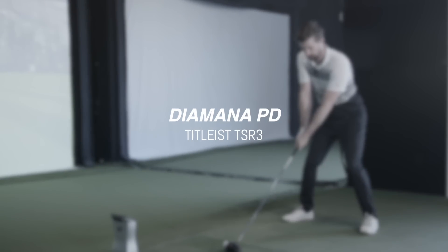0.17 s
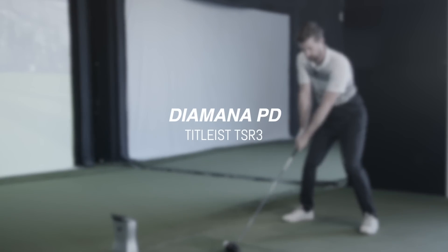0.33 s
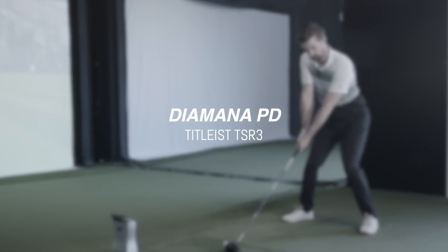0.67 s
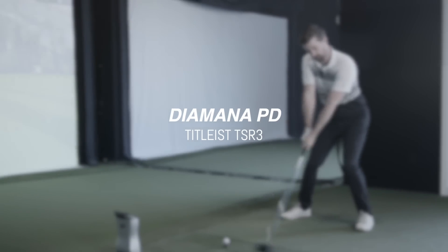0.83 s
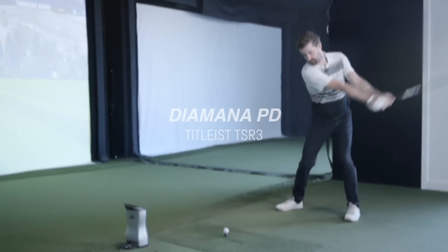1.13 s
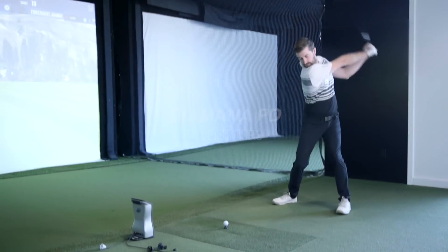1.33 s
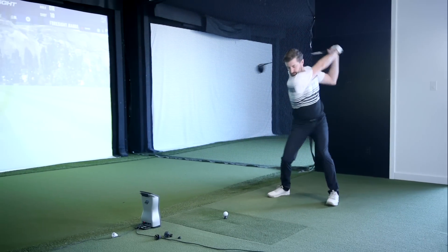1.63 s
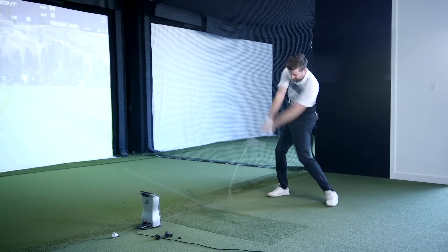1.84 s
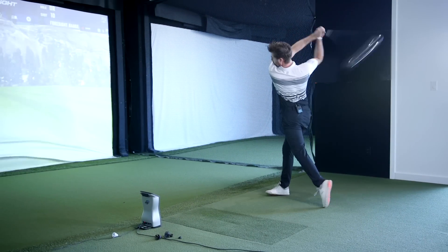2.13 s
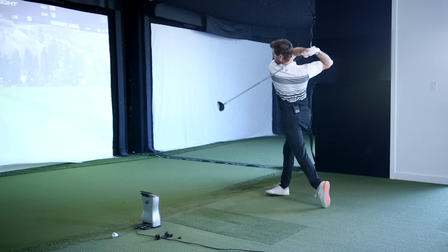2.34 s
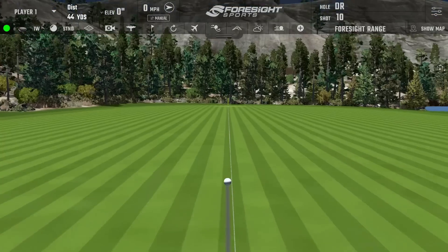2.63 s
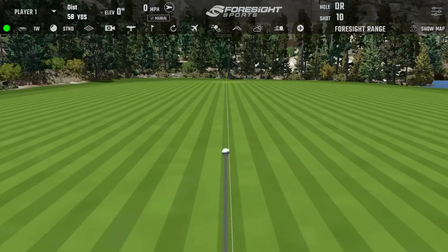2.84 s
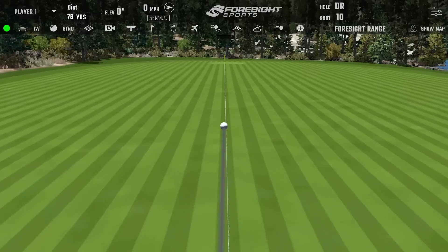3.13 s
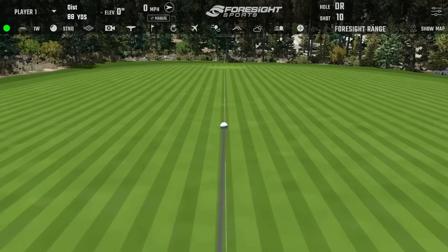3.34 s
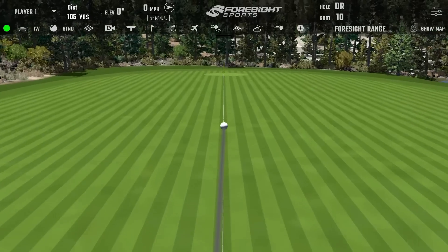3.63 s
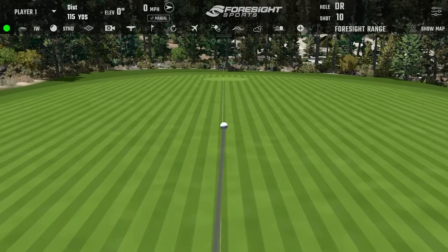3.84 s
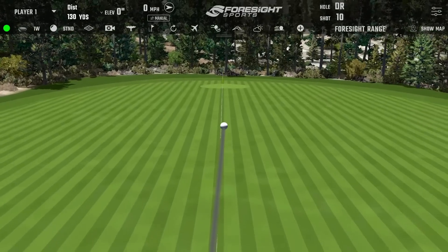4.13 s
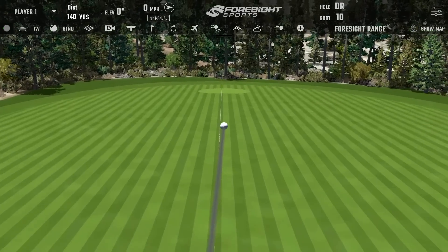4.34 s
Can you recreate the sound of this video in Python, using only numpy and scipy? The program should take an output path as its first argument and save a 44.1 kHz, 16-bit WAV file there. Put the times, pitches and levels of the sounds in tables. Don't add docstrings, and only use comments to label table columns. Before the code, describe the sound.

A golf driver cracks a ball in a reverberant indoor bay after cloth rustle and a swish, then the ball booms into a hanging screen.

```python
import sys
import numpy as np
from scipy import signal
from scipy.io import wavfile
from scipy.ndimage import uniform_filter1d

SR = 44100
rng = np.random.default_rng(int(sys.argv[2]) if len(sys.argv) > 2 else 0)


def invert_db(x):
    u = np.asarray(x, float) / 20
    return 10 ** u


def file_out(sig):
    cols = np.atleast_2d(sig).T
    lim = np.clip(cols, -1, 1)
    pcm = np.round(lim * 32767).astype(np.int16)
    wavfile.write(sys.argv[1], SR, pcm)


N = 197700

# [f/Hz, t60/s], t60 = time to fall by 60 dB
HALL_RING = [(60, 1.6), (120, 1.1), (250, 1.014), (1000, 1.126), (3000, 1.216), (5500, 1.013), (8000, 0.76),
             (12000, 0.69), (16000, .4)]
# [f/Hz, level/dB per Hz]
AIR_COLOUR = [(15, -39.5), (25, -14), (107, 1.5), (148, -10.5), (189, -13), (361, -16.5), (391, -13),
              (512, -19.5), (602, -20), (688, -19.5), (809, -24), (1500, -32), (4500, -41.5), (15700, -46)]
# [f/Hz, level/dB]
FAN_HUM = [(393.0, -68.5), (543.7, -67), (592.2, -66.5)]
# [f/Hz, level/dB per Hz]
SLACK_CLOTH = [(400, -21.5), (1300, 0.5), (3460, -3.5), (4640, 1), (7080, -6), (7740, -3.5), (11900, -3),
               (15700, -7)]
TAUT_CLOTH = [(600, -28.5), (1200, -5.5), (2200, -0.5), (3500, -8), (8320, -11), (15700, -15)]
# [peak t/s, level/dB, rise/s, fall/s, tautness/0-1]
RUBS = [(0.33, -85, 0.073, .08, .1), (0.77, -68.5, 0.069, .08, .1), (1.17, -60.5, 0.25, .35, 0.34),
        (1.46, -55.5, 0.16, .04, 0), (1.492, -53, 0.022, .06, 0), (1.55, -45, 0.084, .09, 0),
        (1.625, -49.5, 0.027, .035, 0.8), (1.68, -52, .04, .04, 0.5), (1.733, -38.5, 0.034, .04, 1),
        (1.86, -42.5, .08, .012, .1), (2.33, -61, .2, .2, 0.2), (2.57, -63.5, .12, .12, 0),
        (2.68, -60, .03, .2, 0.2), (2.858, -61, 0.0088, .025, .1), (4.305, -60.5, 0.056, 0.12, 1)]
# [peak t/s, level/dB, rise/s, fall/s]
JOLTS = [
    (1.08, -49.5, .1, .08),
    (1.41, -51, 0.07, .07),
    (1.5, -41, 0.022, 0.097),
    (1.79, -36.5, 0.19, 0.12),
    (1.875, -22.5, 0.017, 0.045),
    (4.299, -47.5, 0.028, 0.049),
]
# [t/s, level/dB before a shared 9.5 dB lift, f/Hz, t60/s]
TICKS = [(1.3615, -32.5, 13500, 0.00035), (1.682, -41, 5600, 0.00063), (2.16, -30, 13000, 0.0009),
         (2.8574, -54, 4246, 0.0007), (3.1454, -62, 4500, 0.003), (3.9474, -63, 4500, 0.0007),
         (3.959, -46, 4100, 0.00077), (4.0143, -44.5, 14800, 0.0007), (4.1746, -54, 3760, 0.00082),
         (4.2054, -56, 4050, 0.00087), (4.29, -48, 5940, 0.0007), (4.314, -48, 7500, 0.00072),
         (4.3241, -45, 3980, 0.0012)]
# [f/Hz, level/dB, t60/s]
LIP_CLICK_RING = [(1460, -33, 0.012), (2600, -37, .004), (3820, -34, 0.008), (5500, -40, 0.007)]
# [f/Hz, t60/s]
FACE_PING = (2400, .016)
# [f/Hz, level/dB, t60/s]
LOW_PING = (1050, -5, .016)
# [f/Hz, level/dB, t60/s]
HEAD_RING = [(4500, -4, .1), (5720, 2, 0.1), (5900, -3, .09), (6260, -10, .1), (7140, -11.5, .12),
             (9130, -8, .04)]
# [f/Hz, level/dB, t60/s]
HALL_BAND_RING = (4450, 3, .04)
# [f/Hz, level/dB per Hz]
CRACK_COLOUR = [(120, -34), (200, -15), (340, -17), (580, -17), (877, -11), (2030, -21.5), (6300, -20.5),
                (9420, -34), (15700, -56.5)]
# [t/s, level/dB]
WALL_SLAPS = [
    (1.8742, -3),
    (1.8835, -8),
    (1.8882, -4),
    (1.8905, -4),
    (1.896, -8),
    (1.9203, -6),
]
# [f/Hz, level/dB per Hz]
FLIGHT_COLOUR = [(1500, -20), (4000, -9.5), (7000, 4), (11000, -1), (16000, -9.5)]
# [f/Hz, level/dB, t60/s]
BOOM_RING = [(107.5, -0.5, 1.175), (145.7, -7, 0.59), (173.7, -1.5, 0.77), (320.2, -10.5, 0.73),
             (351.7, -12, 0.82)]
# [f/Hz, level/dB per Hz]
THUD_COLOUR = [(30, -23), (100, -0.5), (170, 1.5), (260, -9), (500, -14.5), (850, -6.5), (1400, -17),
               (2500, -28), (6000, -37.5), (14000, -64.5)]
# [t/s, f/Hz, level/dB, t60/s]
PUNCHES = [
    (1.9535, 155, 1.5, .11),
    (2.038, 190, -3, .08),
]
# [t/s, f/Hz, level/dB, length/s]
SAG = (2.632, 246, -32, 0.055)
# [f/Hz, level/dB per Hz]
DROP_COLOUR = [(50, -31), (140, 0), (400, -11), (1100, -10), (2000, -17), (3000, -27), (4500, -44),
               (9000, -70)]
# [t/s, f/Hz, level/dB, t60/s]
FLOOR_BUMP = (3.1625, 165, -30, .09)

STRIKE_S, SCREEN_S = 1.8645, 1.943


def evened(x):
    return x / np.sqrt(np.mean(x ** 2) + 1e-20)


def read(points, hz):
    f, value = np.transpose(points)
    return np.interp(np.log(hz + 1), np.log(f + 1), value)


def add(mix, s, sound):
    part = mix[round(s * SR):][:len(sound)]
    part += sound[:len(part)]


def coloured(x, points):
    hz = abs(np.fft.fftfreq(8192, 1 / SR))
    log_gain = np.log(invert_db(np.maximum(read(points, hz), -90)))
    response = np.exp(signal.hilbert(log_gain).conj())
    taps = np.fft.ifft(response).real[:4096]
    return signal.fftconvolve(x, taps)[:len(x)]


def ringing(modes, seconds):
    t = np.arange(round(seconds * SR)) / SR
    return sum(invert_db(db - 60 * t / t60) * np.sin(2 * np.pi * hz * t) for hz, db, t60 in modes)


def hall(fill_s):
    echoes = np.zeros(2 * SR)
    at = np.arange(0, 2 * SR - 12, 12)
    echoes[at + rng.integers(0, 12, len(at))] = rng.choice([-1., 1.], len(at))
    hz, t, z = signal.stft(echoes, SR, nperseg=512)
    fade = invert_db(-60 * t / read(HALL_RING, hz)[:, None])
    tail = signal.istft(z * fade, SR, nperseg=512)[1]
    tail *= 1 - np.exp(-np.arange(len(tail)) / (fill_s * SR))
    return tail / np.linalg.norm(tail)


def blow(spectrum, fill_s):
    x = coloured(hall(fill_s), spectrum)
    return x / np.sqrt(np.mean(x[:3500] ** 2))


def move(s, db, rise_s, fall_s):
    t = np.arange(N) / SR - s
    distance = np.minimum(abs(t) / np.where(t < 0, rise_s, fall_s), 3)
    return invert_db(db - 21 * distance ** 2.0)


def ventilation():
    frames, hz, t = N // 512 + 5, np.fft.rfftfreq(2048, 1 / SR), np.arange(N) / SR
    a, b, patches = rng.standard_normal((frames, 1025, 3)).T
    patches = evened(uniform_filter1d(uniform_filter1d(patches, 12, 0), 6, 1))
    patchy_db = 0.9
    z = (a + 1j * b) * invert_db(read(AIR_COLOUR, hz)[:, None] + patchy_db * patches)
    air = signal.istft(z, nperseg=2048, noverlap=1536)[1][:N]
    out = invert_db(-47.5) * evened(air)
    for f, db in FAN_HUM:
        waver = evened(uniform_filter1d(rng.standard_normal(N), 3000))
        phase = 2 * np.pi * f * t + 0.57 * np.cumsum(waver) / 600
        out += invert_db(db + 3 + 1.2 * waver) * np.sin(phase)
    return out


def cloth():
    unevenness_db = 1.8 * evened(uniform_filter1d(rng.standard_normal(N), 90))
    grains = rng.standard_normal(N) * invert_db(unevenness_db)
    slack = evened(coloured(grains, SLACK_CLOTH))
    tight = evened(coloured(grains, TAUT_CLOTH))
    out = np.zeros(N)
    for *row, taut in RUBS:
        out += move(*row) * ((1 - taut) * slack + taut * tight)
    jolt_colour = [(15, -28.5), (40, -4), (90, 0.5), (200, -9.5), (500, -36.0), (2000, -85)]
    jolts = evened(coloured(rng.standard_normal(N), jolt_colour))
    return out + sum(move(*row) for row in JOLTS) * jolts


def ticks_and_lip_click():
    out, t = np.zeros(N), np.arange(400) / SR
    for s, db, hz, t60 in TICKS:
        add(out, s, invert_db(db + 9.5 - 60 * t / t60) * np.cos(2 * np.pi * hz * t))
    add(out, 4.2598, -ringing(LIP_CLICK_RING, .05))
    return out


def swish():
    start_s, level_db, pitch_hz, rest_share = 1.775, -18.5, 795, .75
    speed = np.linspace(.01, 1, round((STRIKE_S - start_s) * SR))
    noise = rng.standard_normal(SR)[:len(speed)]
    pitch = pitch_hz * (rest_share + (1 - rest_share) * speed)
    turn = np.exp(2j * np.pi * np.cumsum(pitch) / SR)
    r = np.exp(-np.pi * 340 / SR)
    whistle = (turn * signal.lfilter([1], [1, -2 * r, r * r], noise / turn)).real
    skirt = coloured(noise, [(1200, -34.5), (3200, 6.5), (5000, -1.5), (9000, -16.0), (16000, -18.5)])
    loudness = invert_db(level_db + 33.5 * np.log10(speed))
    x = loudness * (evened(whistle) + invert_db(-14.0) * evened(skirt))
    x = np.pad(x * np.clip((1 - speed) / 0.025, 0, 1), (0, SR))
    return start_s, x + invert_db(1.5) * signal.fftconvolve(x, hall(.01))[:len(x)]


def strike():
    out, u = np.zeros(N), np.linspace(-3, 3, 70)
    level_db, head_s = -2.5, STRIKE_S + .0055
    ping_hz, ping_t60 = FACE_PING
    ping = ringing([(ping_hz, 0, ping_t60), LOW_PING], .05)
    add(out, STRIKE_S, ping * (1 - np.exp(-np.arange(len(ping)) / (.0007 * SR))))
    head = ringing(HEAD_RING, .5)
    add(out, head_s, invert_db(-15) * head)
    into_hall = invert_db(-7.5) * head + ringing([HALL_BAND_RING], .5)
    add(out, head_s, invert_db(level_db - 17) * signal.fftconvolve(into_hall, hall(0.0035)))
    add(out, STRIKE_S, invert_db(level_db - 12.0) * blow(CRACK_COLOUR, 0.0083))
    pulse = (1 - .7 * u ** 2) * np.exp(-u ** 2 / 2)
    for s, db in WALL_SLAPS:
        add(out, s - 35 / SR, -invert_db(db) * pulse)
    return out


def flight():
    level_db, fall_db_per_s = -15, 41
    t = np.arange(round((SCREEN_S + .008 - STRIKE_S) * SR)) / SR
    hiss = evened(coloured(rng.standard_normal(len(t)), FLIGHT_COLOUR))
    edges = np.clip(t / .008, 0, 1) * np.clip((t[-1] - t) / .005, 0, 1)
    x = np.pad(invert_db(level_db - fall_db_per_s * t) * edges * hiss, (0, SR))
    return STRIKE_S + .001, x + invert_db(-10.5) * signal.fftconvolve(x, hall(.01))[:len(x)]


def screen():
    out, t, level_db = np.zeros(N), np.arange(2 * SR) / SR, 4
    add(out, SCREEN_S, -invert_db(level_db - 3.5) * np.hanning(40))
    boom = (1 - np.exp(-t / 0.0023)) * ringing(BOOM_RING, 2)
    add(out, SCREEN_S + .001, invert_db(level_db - 11.5) * boom)
    for s, *mode in PUNCHES:
        add(out, s, ringing([mode], .2))
    add(out, SCREEN_S, invert_db(level_db - 14) * blow(THUD_COLOUR, 0.013))
    s, hz, db, length = SAG
    bump = t[:round(length * SR)]
    add(out, s, invert_db(db) * np.hanning(len(bump)) * np.sin(2 * np.pi * hz * bump))
    return out


def ball_drop():
    out = np.zeros(N)
    drop = blow(DROP_COLOUR, 0.0086)
    early_db = 3.5 * np.exp(-np.arange(len(drop)) / (0.05 * SR))
    add(out, 3.148, invert_db(-40 + early_db) * drop)
    add(out, FLOOR_BUMP[0], -ringing([FLOOR_BUMP[1:]], .15))
    return out


def scene():
    out = ventilation() + cloth() + ticks_and_lip_click() + strike() + screen() + ball_drop()
    add(out, *swish())
    add(out, *flight())
    return out[None]


def low_pass(x):
    return signal.sosfilt(signal.butter(12, 16360, fs=SR, output="sos"), x)


def record(dry):
    fall = np.arange(N) * 120.0 / SR
    peak_db = 20 * np.log10(abs(dry[0]) + 1e-9)
    held_peak_db = np.maximum.accumulate(peak_db + fall) - fall
    over_db = np.maximum(held_peak_db - 0.5, 0)
    held = dry / invert_db(uniform_filter1d(over_db, 90))
    treble_cut = signal.firwin(401, 15780, window=("kaiser", 9), fs=SR)
    held = signal.oaconvolve(held, treble_cut[None], "same")
    return low_pass(np.clip(held, -1, 1))


dry = scene()
out = record(dry)
file_out(out)
```